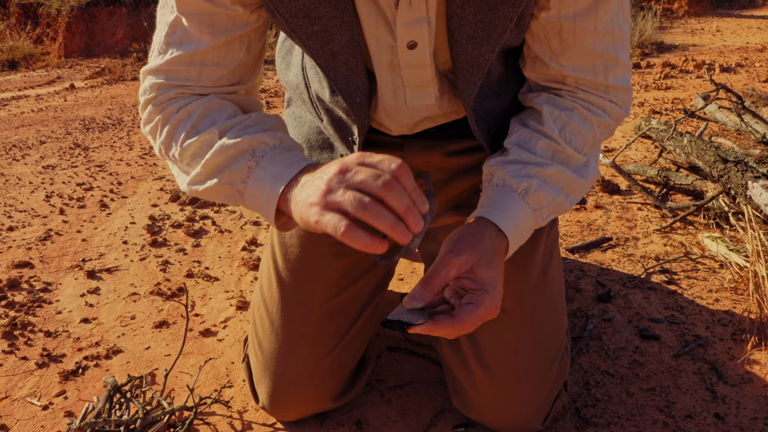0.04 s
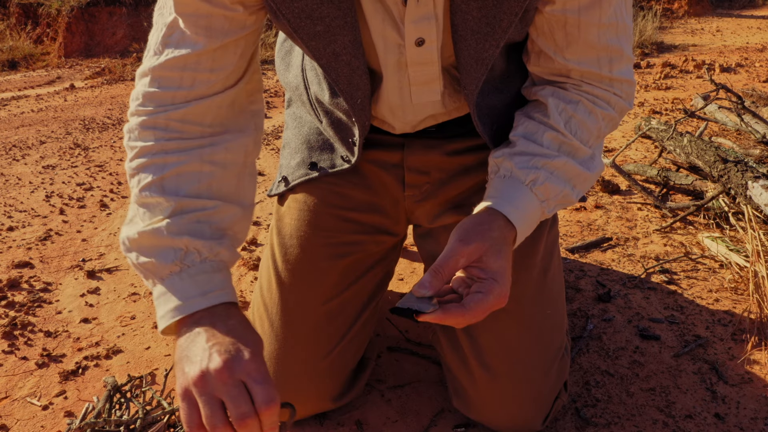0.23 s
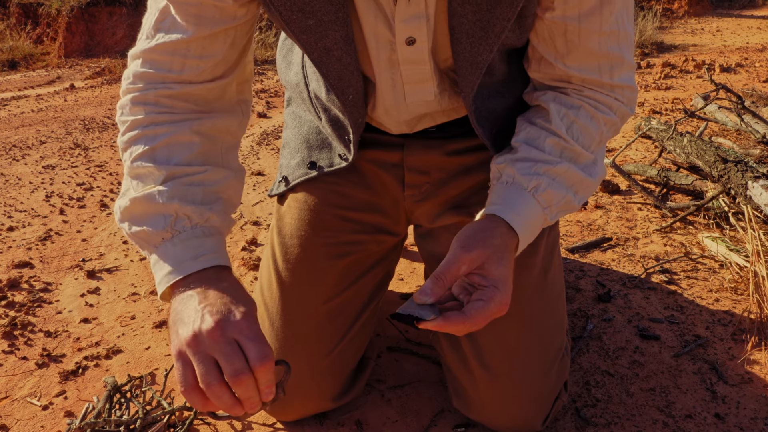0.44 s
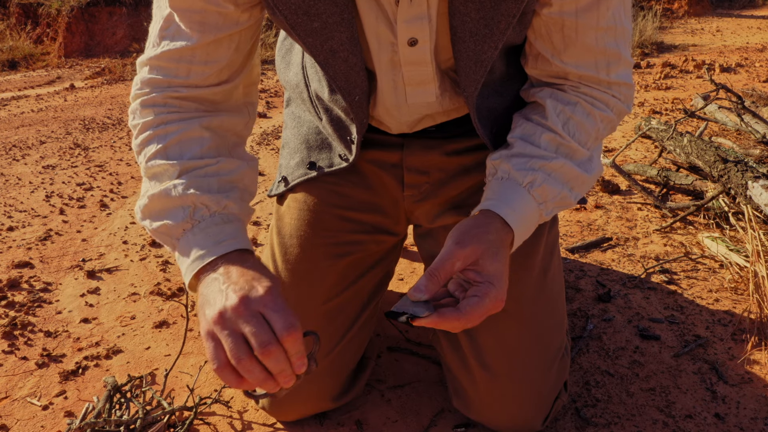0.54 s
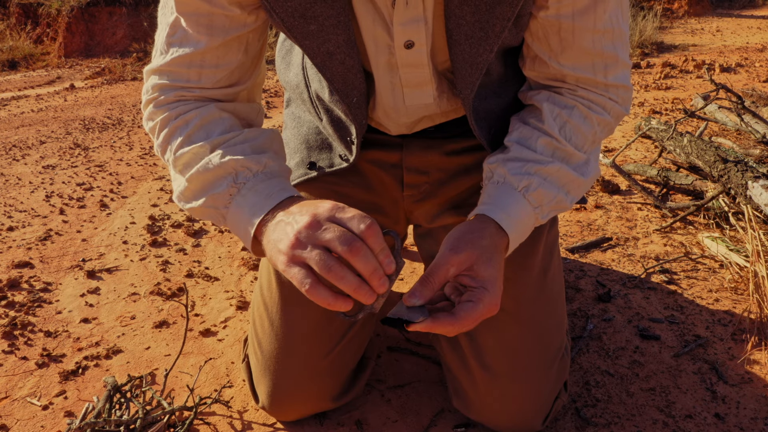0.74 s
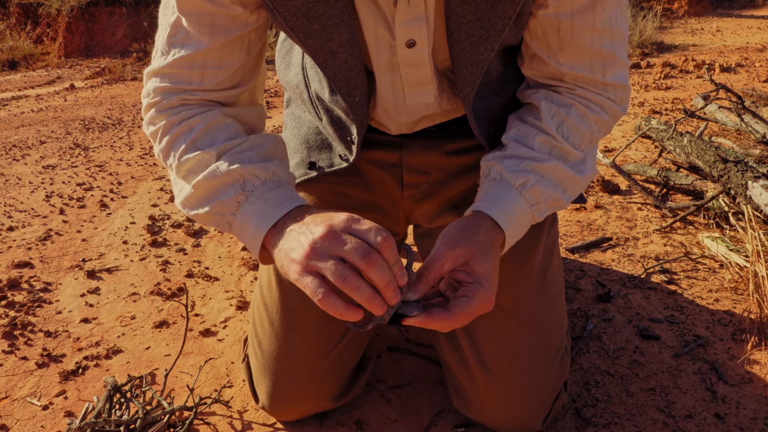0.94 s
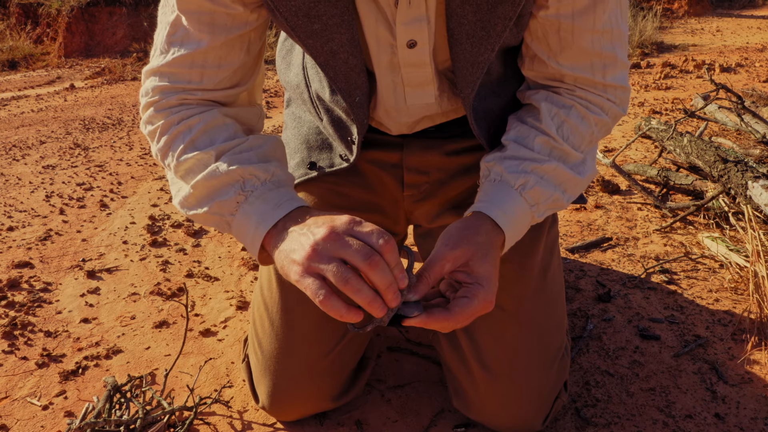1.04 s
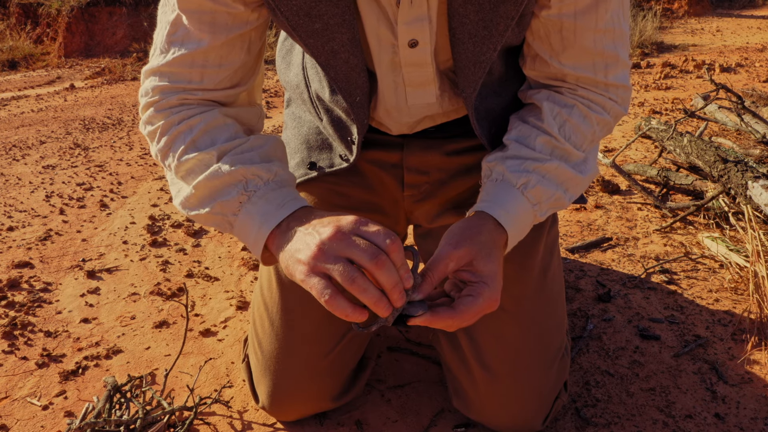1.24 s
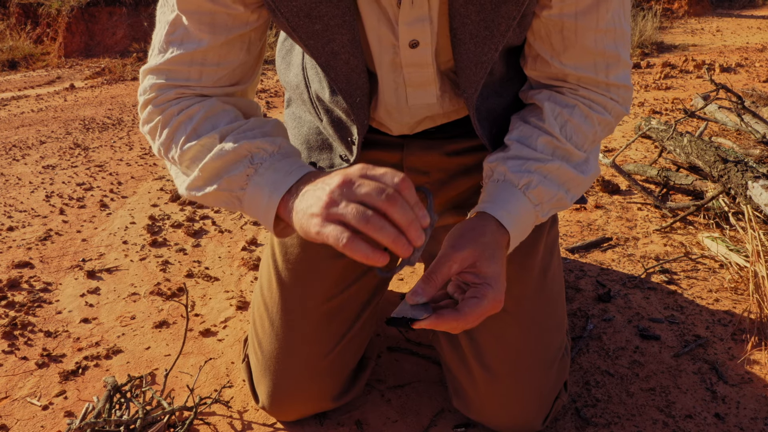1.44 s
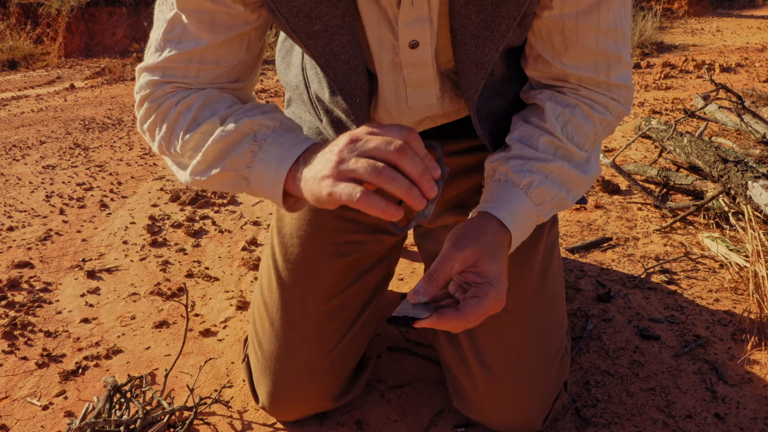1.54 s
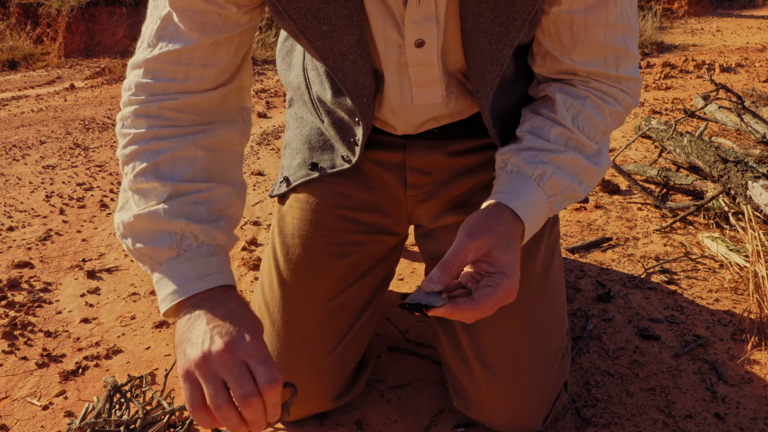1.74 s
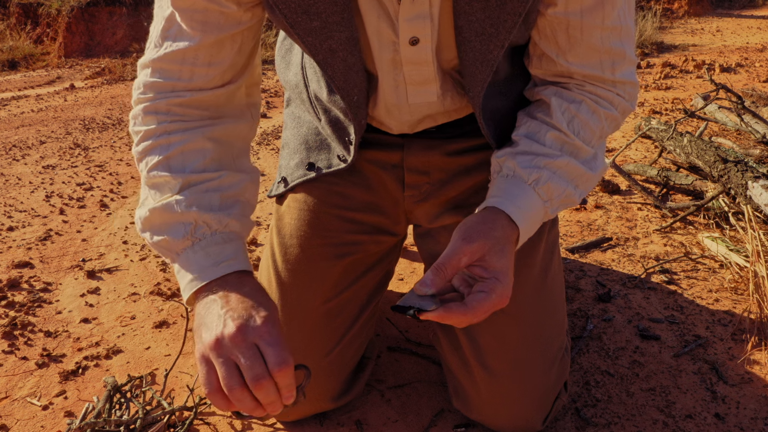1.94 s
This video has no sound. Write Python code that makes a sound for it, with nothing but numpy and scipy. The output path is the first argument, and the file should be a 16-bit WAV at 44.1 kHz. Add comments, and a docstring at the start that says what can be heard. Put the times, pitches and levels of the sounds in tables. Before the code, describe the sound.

Close stereo microphone outdoors: one hard metallic flint strike early, a light clack of stone midway, then a second strike near the end, with quiet cricket chirps left, steady insect hiss and a faint low drone right.

```python
"""A wide summer field: a steel striker hits a flint twice in the centre, each blow skidding into a short scrape.
Small knocks of the stone fall between the blows, a faint one just after the second; steel and flint are banks
of decaying modes rung by clicks and gritty noise. Around them: sine-like crickets on the left, throbbing cicada
noise bands, a high insect buzz gated by wing strokes, an insect rasp and leafy hiss on the right,
a low harmonic drone and wind on the right microphone port."""
import sys
import numpy as np
from scipy import signal
from scipy.fft import rfft, irfft
from scipy.io import wavfile
from scipy.ndimage import uniform_filter1d

SR = 44100
rng = np.random.default_rng(int(sys.argv[2]) if len(sys.argv) > 2 else 0)


def gain_from_decibels(decibels):
    """Convert decibel values to linear amplitude factors."""
    exponent = np.asarray(decibels, float) / 20
    return 10 ** exponent


def transcribe(signal):
    """Save signal, clipped to [-1, 1], as a 16-bit WAV file at the path in sys.argv[1]."""
    frames = np.atleast_2d(signal).T
    limited = np.clip(frames, -1, 1)
    pcm = np.round(limited * 32767).astype(np.int16)
    wavfile.write(sys.argv[1], SR, pcm)


N = 85995

# Blows of steel on flint. Each row: time in seconds, level in dB, grip damping (divides the steel's ring times),
# thump of the hand in dB.
BLOWS = [(.21756, -2.5, 3.0, -46), (1.6506, -3, 2.2, -28)]


def unit(x):
    """Scales to rms 1."""
    return x / np.sqrt(np.mean(x ** 2))


def ring(x, hz, t60_s):
    """One decaying mode; a unit click rings at amplitude 1."""
    pole = np.exp(2j * np.pi * hz / SR - np.log(1000) / (t60_s * SR))
    return signal.lfilter([1], [1, -pole], x).imag


def rub(grit, hz, t60_s):
    """One mode under friction, scaled so that steady unit noise gives about rms 1."""
    return ring(grit, hz, t60_s) * np.sqrt(4 * np.log(1000) / (t60_s * SR))


def highpass(x, hz, order):
    """Butterworth high-pass."""
    return signal.sosfilt(signal.butter(order, hz, "highpass", fs=SR, output="sos"), x)


def band(lo_hz, hi_hz, order=2):
    """Band of noise, rms 1."""
    sos = signal.butter(order, [lo_hz, hi_hz], "bandpass", fs=SR, output="sos")
    return unit(signal.sosfilt(sos, rng.standard_normal(N)))


def walk(rate_hz):
    """Smooth random wander, rms 1: noise averaged twice over 1 / rate_hz."""
    k = max(int(SR / rate_hz), 2)
    once = uniform_filter1d(rng.standard_normal(N), k, mode="wrap")
    return unit(uniform_filter1d(once, k, mode="wrap"))


def click(time_s, db):
    """A click shared between two samples."""
    return gain_from_decibels(db) * np.maximum(0, 1 - np.abs(np.arange(N) - time_s * SR))


def skid_grit(t):
    """Friction of the edge on the stone: rough noise under each skid, plus clicks where it catches on a grain."""
    # Each row: start in seconds, rise in seconds, hold in seconds, level in dB.
    scrapes = [(.2200, .001, .0035, -22), (.2253, .0015, .0032, -13), (1.6525, .001, .002, -21),
               (1.6555, .0008, .0042, -14)]
    # Catches on a grain. Each row: time in seconds, level in dB.
    catches = [(.2247, 0), (.22825, 6), (.22878, 6), (1.6532, 3), (1.6563, 2), (1.6590, 5)]
    fall_s, grit_db = .001, 4
    skid = np.zeros(N)
    for start, rise, hold, db in scrapes:
        fall = np.exp(-np.maximum(t - start - rise - hold, 0) / fall_s)
        skid += gain_from_decibels(db) * np.clip((t - start) / rise, 0, 1) * fall
    rough = unit(rng.standard_normal(N) * gain_from_decibels(grit_db * walk(3000)))
    grit = skid * rough + sum(click(s, db) for s, db in catches)
    return highpass(grit, 1620, 3)  # keeps the scrape thin and bright, with little low body


def striker(grit):
    """Steel modes rung by blows and grit; grip and contact shorten the ring, a faint part of the skid rings free."""
    # Each row: mode in Hz, level under a blow in dB, level under a scrape in dB, free t60 in seconds.
    steel = [(4310, -4, -21.5, 0.013), (4410, -54, -5, 0.034), (5186, -15.5, -6.5, 0.042),
             (6066, -26, -8, 0.0073), (7190, -10.5, -9.5, 0.063), (7910, 5.5, -9.5, 0.038),
             (8460, -9, -34, 0.072), (8900, 0, -2, 0.0084), (10860, -16, -9.5, 0.013),
             (11700, -7, -34, 0.023), (11160, -5, -21, 0.01), (13600, -25, -34, .02),
             (13800, -46, -46, .025)]
    skid_damping, free_ring_db = 2.35, -23.5
    lean_db_at_10khz = 1.2  # random lean of a mode, opposite in the two ears
    out = np.zeros((2, N))
    for hz, blow_db, scrape_db, t60_s in steel:
        struck = sum(ring(click(s, db + blow_db), hz, t60_s / grip) for s, db, grip, _ in BLOWS)
        scraped = rub(grit, hz, t60_s / skid_damping) + gain_from_decibels(free_ring_db) * rub(grit, hz, t60_s)
        lean_db = lean_db_at_10khz * hz / 1e4 * rng.standard_normal()
        out += (struck + gain_from_decibels(scrape_db) * scraped) * gain_from_decibels([[lean_db], [-lean_db]])
    return out


def flint(grit):
    """Short modes of the stone in the fingers under knocks and grit, plus a noise crack at each blow."""
    # Each row: mode in Hz, level in dB, t60 in seconds.
    modes = [(830, -46, 0.0042), (1020, -31, 0.0048), (1340, -25, 0.0078), (1880, -11, 0.0023),
             (2646, -7.5, 0.0035), (3120, -8, 0.0039), (3700, -15, 0.012), (5770, -12, 0.0011)]
    # Each row: time in seconds, level in dB.
    knocks = [(.9592, -18), (.96045, -14), (.9619, -24), (.9633, -21), (.9645, -26), (1.7012, -31)]
    scrape_db, crack_db, crack_decay_s = -2.5, -4.5, .0014
    taps = sum(click(s, db) for s, db in knocks)
    out = np.zeros(N)
    for k, (hz, db, t60_s) in enumerate(modes):
        scraped = (-1) ** k * gain_from_decibels(scrape_db) * rub(grit, hz, t60_s)
        out += gain_from_decibels(db) * (ring(taps, hz, t60_s) + scraped)
    blows = sum(click(s, db) for s, db, _, _ in BLOWS)
    crack = signal.lfilter([1], [1, -np.exp(-1 / (crack_decay_s * SR))], blows)
    return out + crack * band(2000, 15000) * gain_from_decibels(crack_db)


def hand_thump():
    """One low damped mode of the hand under each blow."""
    return ring(sum(click(s, hand_db) for s, _, _, hand_db in BLOWS), 253, 0.015)


def strikes(t):
    """Striker and flint share the skid; small objects radiate little below 910 Hz, the hand does."""
    grit = skid_grit(t)
    return highpass(striker(grit) + flint(grit), 910, 2) + hand_thump()


def cricket(t, chirps, syllables):
    """Near-sine syllables whose pitch sags at the end of each wing stroke."""
    sag_hz, warble_db = 420, 3.5
    out = np.zeros(N)
    for start, db in chirps:
        for lag, hz, rel_db, length in syllables:
            u = np.clip((t - start - lag) / length + .5, 0, 1)  # progress through the syllable
            phase = 2 * np.pi * (hz * t - sag_hz * length * u ** 7 / 7)
            out += gain_from_decibels(db + rel_db) * np.sqrt(2) * np.sin(np.pi * u) ** 0.33 * np.sin(phase)
    return out * gain_from_decibels(warble_db * walk(460))


def crickets(t):
    """A near cricket, a farther one and lone faint syllables, all leaning left."""
    # Chirps, near, far and lone. Each row: time in seconds, level in dB.
    near_chirps = [(0.101, -40), (0.486, -38), (0.863, -38), (1.219, -35.5), (1.549, -35), (1.914, -35)]
    far_chirps = [(.205, -69), (.495, -45), (0.791, -43.5), (1.054, -43), (1.375, -46), (1.649, -44)]
    lone_chirps = [(.306, -48), (1.106, -51), (1.746, -53)]
    # Syllables of a chirp. Each row: centre offset in seconds, pitch in Hz, relative level in dB, length in seconds.
    near_syllables = [(-.033, 4480, -13, .018), (.001, 4680, -7, .022), (.043, 4725, -3, .029),
                      (.090, 4730, -2, .029)]
    far_syllables = [(-.046, 4470, -9, .022), (0, 4500, -3, .024), (.046, 4500, -2, .026)]
    out = cricket(t, near_chirps, near_syllables) + cricket(t, far_chirps, far_syllables)
    out += cricket(t, lone_chirps, far_syllables[-1:])
    right_db = -21
    return out * gain_from_decibels([[0], [right_db]])


def cicadas(t):
    """Noise resonances that throb regularly and flicker at random."""
    # One list per ear, left first. Each row: centre in Hz, width in Hz, level in dB, throbs per second,
    # throb depth, throb phase in radians, flicker in dB.
    ears = [
        [(8370, 850, -38, 33.4, 0.11, .1, -1.1)],
        [(8060, 550, -43, 33.4, .25, .1, 6), (8323, 310, -38, 38, 0.34, 0.12, 1.5)],
    ]
    out = np.zeros((2, N))
    for ear, bands in enumerate(ears):
        for hz, width, db, rate, depth, phase, flicker_db in bands:
            throb = 1 + depth * np.cos(2 * np.pi * rate * t + phase)
            level = gain_from_decibels(db + flicker_db * walk(75))
            out[ear] += level * throb * band(hz - width / 2, hz + width / 2)
    return out


def buzz(t):
    """Treble noise gated by fast wing strokes in both ears, and a few slow strokes on the left."""
    # Breakpoints. Each row: time in seconds, left level in dB, right level in dB, relative level of
    # the top band in dB, strokes per second.
    course = np.array([(0, -48.5, -46, 0, 65), (.79, -43.5, -41, -5.5, 67), (.81, -45, -42.5, -9, 53),
                       (1.08, -44, -42, -7, 70), (1.11, -50, -52, -2, 60), (1.35, -49.5, -47, -5, 66),
                       (1.62, -46.5, -49, -3, 66), (1.68, -46, -47, -1, 64.5),
                       (1.95, -43.5, -45, -2.5, 63.4)])
    # Slow strokes. Each row: time in seconds, level in dB.
    ticks = [(1.054, -45), (1.108, -36), (1.173, -42), (1.231, -39), (1.286, -35), (1.337, -37)]
    left_depth, right_depth, phase_rad = 0.89, 0.22, 0.26
    tick_s = 0.0063  # half-width at 1/e
    left_db, right_db, top_db, rate = (np.interp(t, course[:, 0], course[:, k]) for k in range(1, 5))
    stroke = np.cos(2 * np.pi * np.cumsum(rate) / SR + phase_rad)
    out = np.zeros((2, N))
    for ear, (db, depth) in enumerate([(left_db, left_depth), (right_db, right_depth)]):
        body = band(9530, 12500) * (1 + 0.58 * depth * stroke)
        top = gain_from_decibels(top_db) * band(14000, 15100, order=4) * (1 + depth * stroke)
        out[ear] = gain_from_decibels(db) * (body + top)
    pulses = sum(gain_from_decibels(db) * np.exp(-((t - s) / tick_s) ** 2) for s, db in ticks)
    out[0] += pulses * band(9900, 18000)
    return out


def rasp(t):
    """An insect's broad noise band on the right, swelling about ten times a second with a drifting phase."""
    # One row: low edge in Hz, high edge in Hz, level in dB, throbs per second, depth, phase in radians.
    settings = (2720, 7412, -47.5, 10.5, 0.39, 1.5)
    lo_hz, hi_hz, db, rate, depth, phase = settings
    throb = 1 + depth * np.cos(2 * np.pi * rate * t + phase + 0.47 * walk(3.2))
    return gain_from_decibels(db) * band(lo_hz, hi_hz) * throb * np.array([[0], [1]])


def air():
    """Air and foliage hiss: coloured noise in flickering octave bands, partly common to both ears below 2500 Hz."""
    # One list per ear, left first. Each row: frequency in Hz, level in dB per Hz.
    colours = [
        [(20, -106), (50, -86.5), (120, -70), (200, -81.5), (450, -94), (1200, -95.5), (2550, -98.5),
         (2800, -89), (4000, -96), (5200, -88), (6800, -89), (8300, -76.5), (9500, -81), (11000, -102),
         (16000, -104)],
        [(20, -79), (50, -67), (120, -80), (200, -93.5), (450, -105), (1200, -97), (2450, -115), (2800, -93.5),
         (4000, -79), (5200, -78.5), (6800, -71), (8300, -73.5), (9500, -79.5), (11000, -87.5), (16000, -89)],
    ]
    flicker_db, shared_power = 3.5, 0.68
    hz = np.arange(N // 2 + 1) * SR / N + 1
    share = shared_power * (hz < 2500)
    common = rfft(rng.standard_normal(N))
    out = np.zeros((2, N))
    for ear, table in enumerate(colours):
        table_hz, table_db = np.transpose(table)
        colour = gain_from_decibels(np.interp(np.log(hz), np.log(table_hz), table_db)) * np.sqrt(SR / 2)
        own = rfft(rng.standard_normal(N))
        spectrum = colour * (np.sqrt(1 - share) * own + np.sqrt(share) * common)
        for octave in range(4, 15):
            part = np.maximum(0, 1 - np.abs(np.log2(hz) - octave))
            out[ear] += irfft(spectrum * part, N) * gain_from_decibels(flicker_db * walk(7.1))
    return out


def drone(t):
    """A low tone on the right: harmonics of a gliding, unsteady pitch, each wavering in level."""
    # Breakpoints. Each row: time in seconds, pitch in Hz, level in dB.
    course = np.array([(0, 61.7, -40.5), (.1, 61.12, -38.5), (.45, 62.3, -39), (.6, 61.25, -37),
                       (1.05, 61.27, -41), (1.4, 61.92, -47.5), (1.55, 60, -46.5), (1.66, 55.6, -43.5),
                       (1.75, 65.1, -48), (1.82, 75.25, -64), (1.88, 86.5, -37.5), (1.95, 86.5, -39)])
    # Relative level of each harmonic in dB, fundamental first.
    partials_db = [-2.5, -9.5, -22, -27]
    hz, db = (np.interp(t, course[:, 0], course[:, k]) for k in (1, 2))
    phase = 2 * np.pi * np.cumsum(hz * (1 + .02 * walk(11.4))) / SR
    tone = sum(gain_from_decibels(p + 0.9 * walk(5.4)) * np.cos((k + 1) * phase) for k, p in enumerate(partials_db))
    return np.sqrt(2) * gain_from_decibels(db) * tone * np.array([[0], [1]])


def hums():
    """Faint wavering hums in both ears: narrow noise bands."""
    # Each row: centre in Hz, width in Hz, left level in dB, right level in dB.
    rows = [(60, 10, -69, -65), (119.5, 15.4, -57, -100), (143.7, 2.3, -73, -59.5), (216.5, 2.7, -93, -65),
            (235.8, 14, -64, -79.5)]
    return sum(band(hz - width / 2, hz + width / 2, order=1) * gain_from_decibels([[left_db], [right_db]])
               for hz, width, left_db, right_db in rows)


def wind():
    """Wind on the right microphone port: noise of a few Hz."""
    top_hz, db = 7.4, -40.5
    return gain_from_decibels(db) * band(top_hz / 3, top_hz, order=1) * np.array([[0], [1]])


def scene():
    """Striker and flint in the centre, field all round."""
    t = np.arange(N) / SR
    insects = crickets(t) + cicadas(t) + buzz(t) + rasp(t)
    return strikes(t) + insects + air() + drone(t) + hums() + wind()


def low_pass(x):
    """Removes everything above the highest recorded frequency."""
    return signal.sosfilt(signal.butter(12, 16960, fs=SR, output="sos"), x)


def record(dry):
    """The loudest peaks are rounded and the top is cut steeply at 15.72 kHz."""
    rounded = np.tanh(dry * 0.78) / 0.82
    cut = signal.ellip(10, .2, 60, 15720, fs=SR, output="sos")
    return low_pass(signal.sosfilt(cut, rounded))


dry = scene()
out = record(dry)
transcribe(out)
```